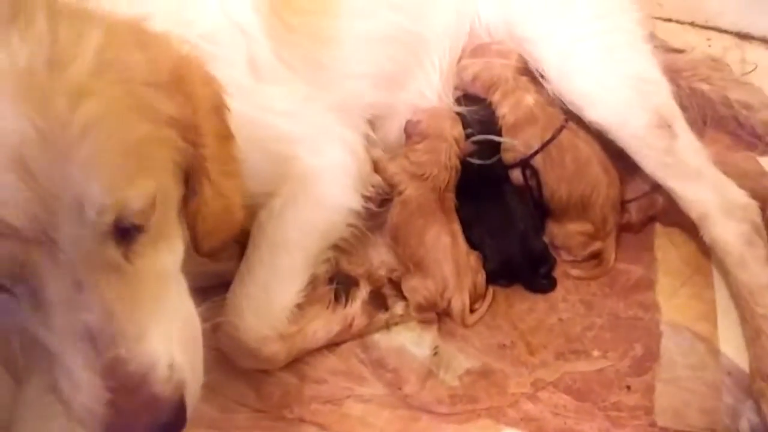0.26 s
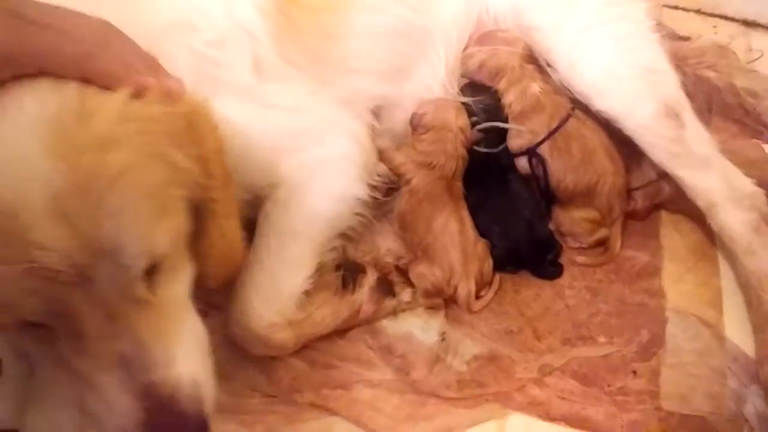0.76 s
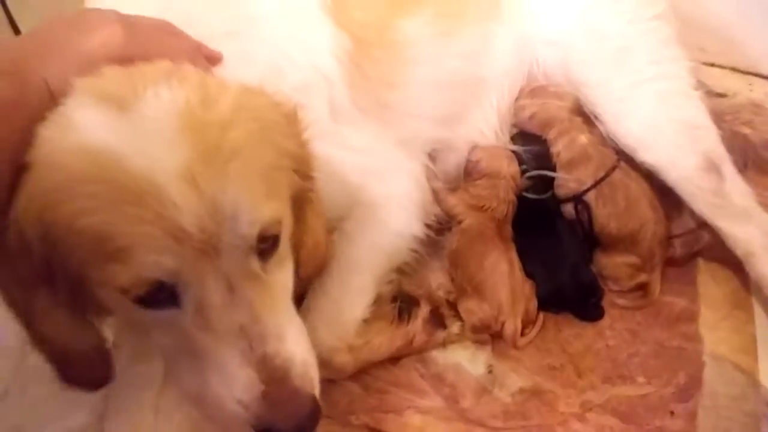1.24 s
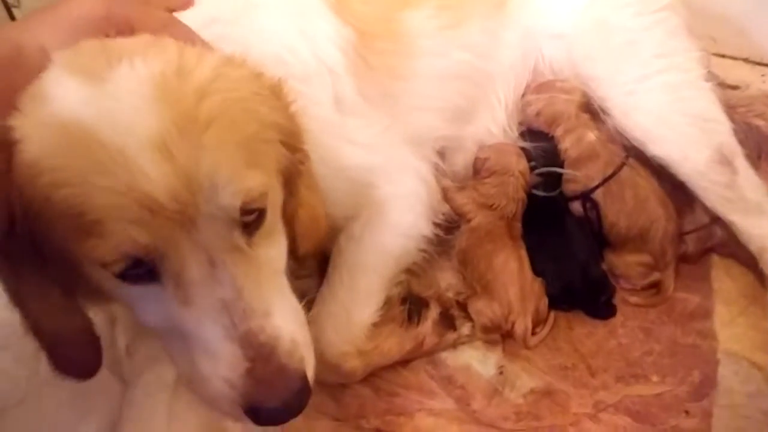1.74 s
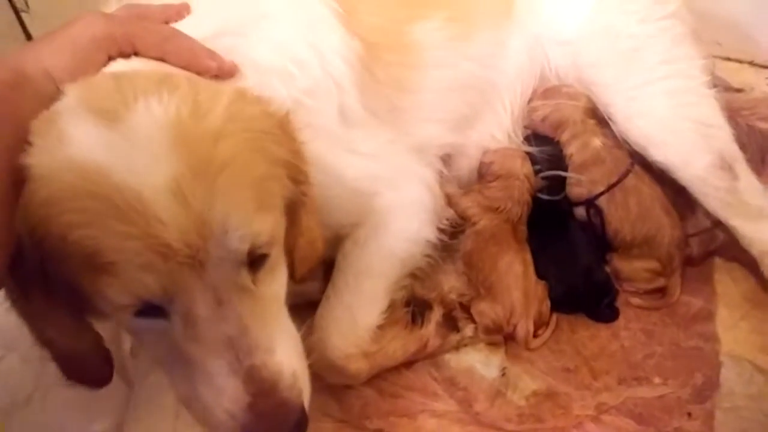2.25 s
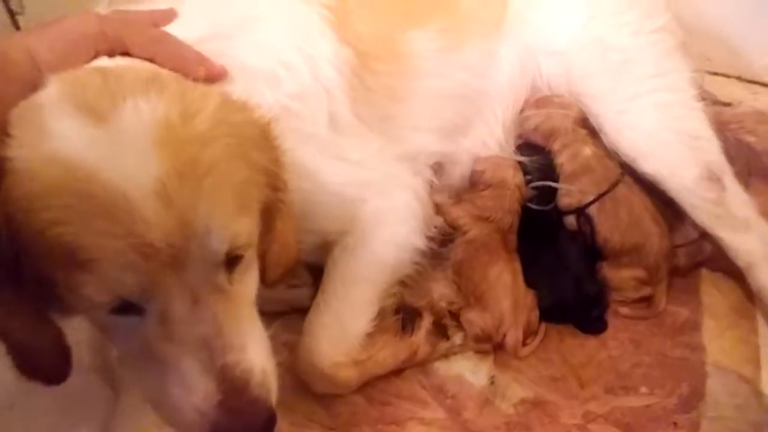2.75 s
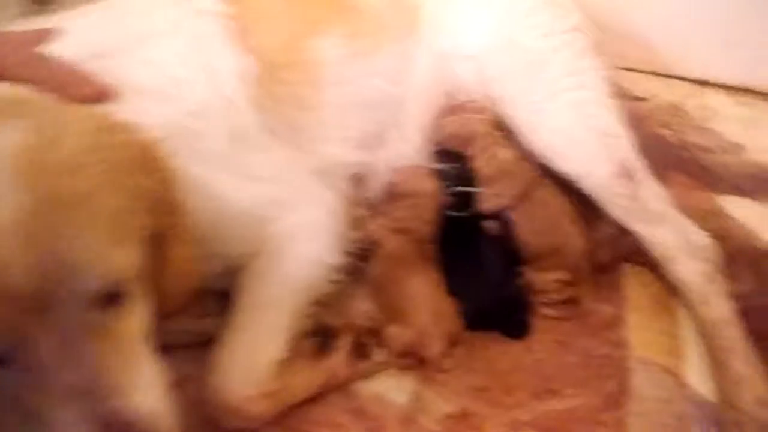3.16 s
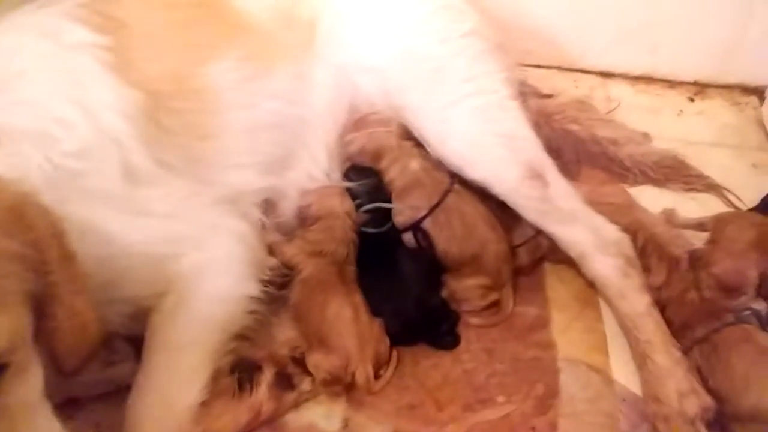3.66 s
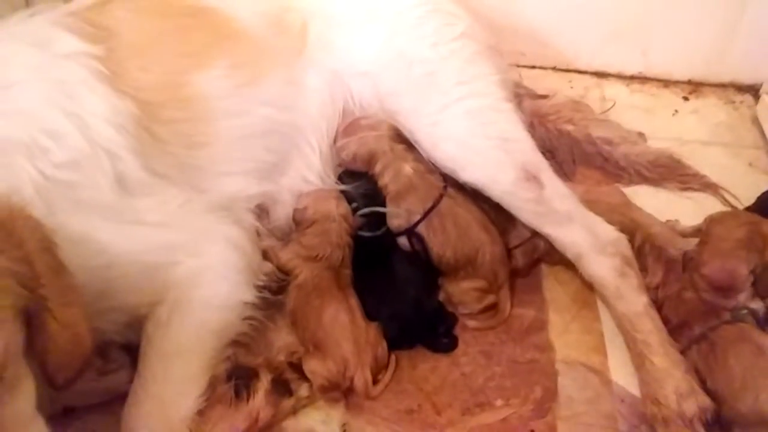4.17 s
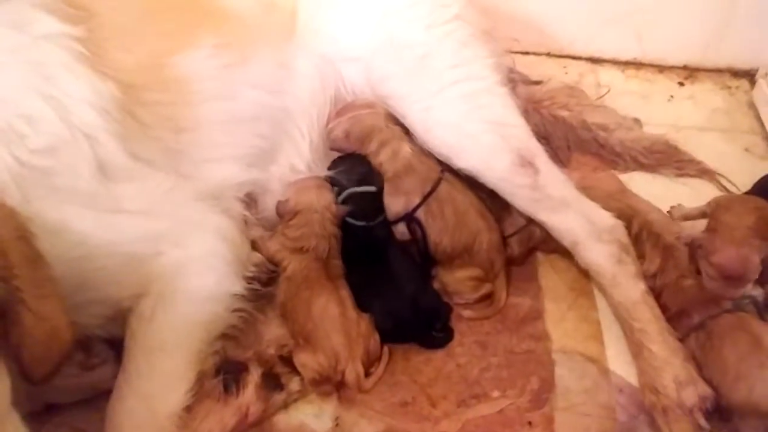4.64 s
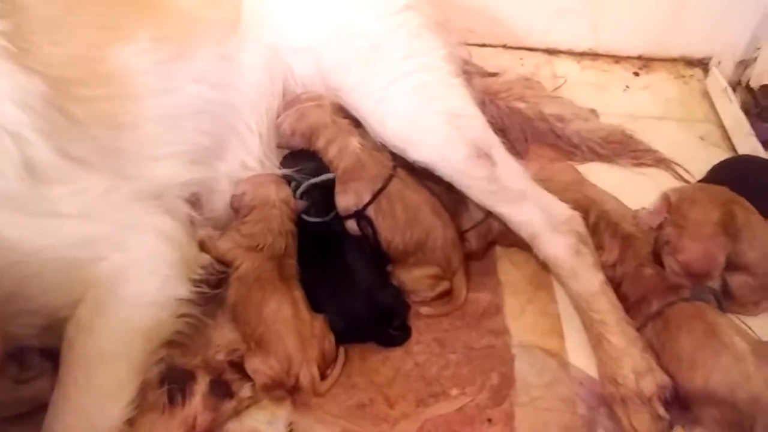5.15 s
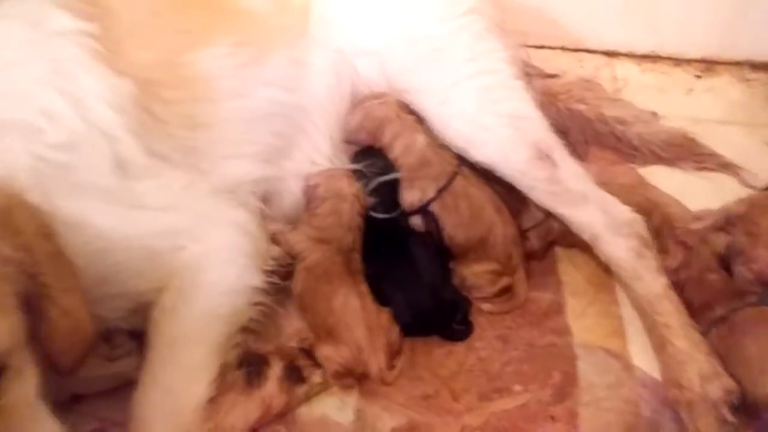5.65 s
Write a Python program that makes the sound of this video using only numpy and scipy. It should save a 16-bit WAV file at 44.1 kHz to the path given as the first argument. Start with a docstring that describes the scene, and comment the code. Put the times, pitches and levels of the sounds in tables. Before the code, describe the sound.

Close, slightly thin pickup of a puppy litter indoors. Strong cries come first, one sliding down and rasping out, another rising to a squeak. Lower grumbling whines and bright short yelps alternate and overlap, a more distant pup joining in. Quiet bumps, breathy hiss and low room air sit underneath; a short grunt comes near the end.

```python
"""Newborn puppies whine in overlapping runs on a blanket in a small quiet room.
Each cry is a gliding stack of overtones, raspier at its ends; hoarse noise follows the low and near pups.
Shaped noise makes breaths, smacks, a grunt and a thin whistle; sparse reflections give the room.
Beneath lie soft low thumps (sine and noise), a mains hum (sine) and room air (filtered noise)."""
import sys
import numpy as np
from scipy import signal
from scipy.fft import rfft, irfft
from scipy.io import wavfile
from scipy.ndimage import uniform_filter1d

SR = 44100
rng = np.random.default_rng(int(sys.argv[2]) if len(sys.argv) > 2 else 0)


def inscribe(sig):
    """Save sig as 16-bit PCM at rate SR to the path in sys.argv[1].

    A 1-D sig is mono; a 2-D sig holds one channel per row.
    Samples are clipped to [-1, 1] before scaling.
    """
    pcm = np.round(np.clip(np.atleast_2d(sig).T, -1, 1) * 32767)
    wavfile.write(sys.argv[1], SR, pcm.astype(np.int16))


N = 260359

# pitch and effort through each cry, one table a cry: [t/s, f/Hz, effort/dB]
LOW_CRIES = [
    [(0.0, 940.4, -17), (0.05, 969, -23), (0.1, 944.5, -21), (0.17, 949, -21.5), (0.25, 871, -26),
     (0.32, 821.6, -27.5), (0.39, 811.7, -29), (0.47, 740, -30), (0.55, 695, -34), (0.6, 612, -36),
     (0.64, 620, -36.5), (0.69, 498.3, -37), (0.75, 604, -42.5), (0.82, 600, -58)],
    [(1.092, 430, -47), (1.15, 490, -36.5), (1.18, 607.3, -37.5), (1.23, 627.5, -32), (1.32, 662, -35),
     (1.38, 767, -29.5), (1.43, 795.6, -29.5), (1.54, 773.4, -33.5), (1.6, 784, -30.5),
     (1.69, 760.5, -35.5), (1.78, 748.5, -33.5), (1.86, 660, -35), (1.95, 645, -36.5), (2.03, 609, -37),
     (2.12, 420, -43), (2.19, 428, -54)],
    [(2.69, 318.4, -37), (2.75, 332.5, -41), (2.82, 402.5, -40), (2.9, 557.7, -41), (2.97, 411, -41),
     (3.01, 433, -39.5), (3.09, 639.4, -37), (3.165, 565.4, -35), (3.24, 643, -35.5), (3.35, 591.7, -37),
     (3.43, 621, -37.5), (3.52, 569, -38.5), (3.655, 448, -42), (3.69, 377.7, -42.5), (3.8, 363, -47),
     (3.87, 341, -46.5), (3.92, 398, -46), (3.96, 398, -78.5)],
    [(4.52, 330, -41.5), (4.62, 371.1, -40.5), (4.72, 443, -38.5), (4.88, 506.2, -39), (5.0, 527.5, -37.5),
     (5.1, 530.6, -37.5), (5.15, 563.3, -36.5), (5.22, 644, -35.5), (5.29, 623.7, -35.5),
     (5.42, 693.7, -33.5), (5.56, 650, -37), (5.62, 542, -38.5), (5.7, 514, -64)],
]
# the same for the near pup: [t/s, f/Hz, effort/dB]
NEAR_CRIES = [
    [(2.49, 767, -44), (2.515, 790, -41), (2.53, 813, -25.5), (2.545, 902, -29), (2.6, 959, -25),
     (2.66, 944, -28), (2.69, 1031, -30.5), (2.73, 825, -35.5), (2.77, 846, -33.5), (2.82, 995, -58)],
    [(2.79, 759, -41), (2.85, 830, -37.5), (2.9, 822, -37.5), (2.98, 729, -39)],
    [(4.008, 703, -39.5), (4.04, 816, -26.5), (4.075, 900, -24), (4.11, 890, -25.5), (4.14, 916, -27),
     (4.18, 894, -24.5), (4.23, 790, -31), (4.28, 645, -36), (4.31, 760, -37.5), (4.35, 700, -34.5),
     (4.37, 790.2, -36.5), (4.387, 993, -33.5), (4.415, 725, -41.5), (4.455, 790, -38.5), (4.49, 697, -42),
     (4.56, 963, -31.5), (4.59, 928, -36.5), (4.68, 975, -32.5), (4.75, 881, -34), (4.82, 1040, -45.5),
     (4.93, 950, -35), (4.97, 967, -35), (5.02, 775, -41), (5.05, 790, -39.5), (5.11, 666, -55.5)],
    [(5.888, 819, -70.5), (5.903, 858, -35.5)],
]


def gain_of(db):
    return 10 ** (np.asarray(db) / 20)


def evened(x):
    """Scale to rms 1."""
    return x / np.sqrt(np.mean(x ** 2) + 1e-20)


def read(points, hz):
    """Interpolate a response over log frequency."""
    f, value = np.transpose(points)
    return np.interp(np.log(hz + 1), np.log(f + 1), value)


def filtered(x, response):
    """Weigh the spectrum by a response in dB."""
    return irfft(rfft(x) * gain_of(read(response, np.fft.rfftfreq(N, 1 / SR))), N)


def add(mix, start_s, sound):
    part = mix[round(start_s * SR):][:len(sound)]
    part += sound[:len(part)]


def wobble(size, hz):
    """Low-passed noise of rms 1, cutoff hz."""
    warmup = 9000
    lowpass = signal.butter(2, hz, fs=SR, output="sos")
    return evened(signal.sosfilt(lowpass, rng.standard_normal(size + warmup))[warmup:])


def band_noise(hz, width_hz):
    """Noise in a band that follows the curve hz: two wobbles on carriers in quadrature."""
    turn = 2 * np.pi * np.cumsum(hz) / SR
    in_phase = wobble(len(hz), width_hz / 2) * np.cos(turn)
    return in_phase + wobble(len(hz), width_hz / 2) * np.sin(turn)


def eased(t, s, v):
    """A smooth cubic curve through the points that never overshoots them."""
    step, slope = np.diff(s), np.diff(v) / np.diff(s)
    a, b = slope[:-1], slope[1:]
    inner = np.where(a * b > 0, 2 * a * b / (a + b + 1e-9), 0)
    m = np.r_[slope[0], inner, slope[-1]]
    i = np.clip(np.searchsorted(s, t) - 1, 0, len(step) - 1)
    u = np.clip((t - s[i]) / step[i], 0, 1)
    glide = v[i] + u * u * (3 - 2 * u) * (v[i + 1] - v[i])
    return glide + step[i] * u * (1 - u) * ((1 - u) * m[i] - u * m[i + 1])


def unrolled(rows):
    """Start, soft-ended fade and the columns of a table at every sample."""
    s, *columns = np.transpose(rows)
    t = np.arange(s[0] - .004, s[-1] + .004, 1 / SR)
    fade = np.clip(np.minimum(t - t[0], t[-1] - t) / .008, 0, 1)
    return max(t[0], 0), fade, [eased(t, s, c) for c in columns]


def background():
    """Room air that wavers slightly, and the hum of an appliance."""
    # air spectrum: [f/Hz, relative density/dB]
    air_spectrum = [(60, -0.5), (110, -5), (170, -9.5), (260, 0.5), (420, -9), (800, -14.5), (2000, -12.5),
                    (4500, -23.5), (9000, -31), (15500, -32.5)]
    air_db, hum_hz, hum_db = -61.5, 120, -64
    air = evened(filtered(rng.standard_normal(N), air_spectrum))
    hum = np.sqrt(2) * np.sin(2 * np.pi * hum_hz * np.arange(N) / SR)
    hum = hum * gain_of(hum_db + 0.4 * wobble(N, 5))
    return gain_of(air_db + 0.11 * wobble(N, 2.3)) * air + hum


def thumps():
    """Each is a dull swell of a few uneven cycles: a low sine with noise around it."""
    # soft low thumps: [t/s, level/dB]
    hits = [(0.244, -45), (0.464, -51.5), (0.595, -54.5), (1.464, -51), (1.756, -53), (2.259, -63),
            (2.702, -52), (2.978, -49), (3.906, -49), (4.134, -55), (5.201, -46.5), (5.367, -48.5),
            (5.43, -46)]
    rise_s, t60_s = 0.0032, 0.49
    out, t = np.zeros(N), np.arange(SR // 4) / SR
    for start_s, db in hits:
        swell = (1 - np.exp(-t / rise_s)) * gain_of(db - 60 * t / t60_s)
        body = np.sin(2 * np.pi * 69 * t) + .6 * band_noise(70 + 0 * t, 95)
        add(out, start_s, swell * body)
    return out


def room(x):
    """Sparse reflections of random sign that die quickly among blankets and walls."""
    t60_s = 0.28
    taps = np.zeros(SR // 2)
    at = np.arange(200, len(taps) - 20, 20)
    at = at + rng.integers(0, 20, len(at))
    taps[at] = rng.choice([-1., 1.], len(at)) * gain_of(-60 * at / SR / t60_s)
    return signal.oaconvolve(x, taps / np.linalg.norm(taps))[:N]


def smacks():
    """Wet smacks of a mouth: short decaying bursts of high noise."""
    # smacks: [t/s, initial level/dB]
    bursts = [(3.8257, -57), (4.144, -61), (4.1984, -67), (4.2199, -52), (4.2304, -51)]
    t60_s = .012
    out, t = np.zeros(N), np.arange(400) / SR
    for start_s, db in bursts:
        add(out, start_s, gain_of(db - 60 * t / t60_s) * band_noise(7000 + 0 * t, 6000))
    return out


def grunt():
    """One short dull puff of low noise."""
    start_s, rise_s, t60_s = 5.772, 0.0046, 0.27
    level_db, centre_hz, width_hz = -45, 620, 550
    t = np.arange(SR // 6) / SR
    swell = np.minimum(t / rise_s, 1) * gain_of(level_db - 60 * t / t60_s)
    return start_s, swell * band_noise(centre_hz + 0 * t, width_hz)


def whistle(rows):
    """A narrow nasal resonance picks out whichever high overtone passes it; faint hiss goes with it."""
    # drive into the resonance: [t/s, level/dB]
    drive = [(4.18, -99.5), (4.3, -75), (4.39, -69.5), (4.501, -78), (4.62, -71), (4.95, -67.5),
             (5.09, -76)]
    peak_hz, half_width_hz = 7750, 350
    start, fade, (hz, *_) = unrolled(rows)
    db = np.interp(start + np.arange(len(hz)) / SR, *np.transpose(drive))
    tone = 0
    for k in range(8, 12):
        tone = tone + band_noise(k * hz, 70) / (1 + ((k * hz - peak_hz) / half_width_hz) ** 2)
    hiss = gain_of(db - 5.5) * band_noise(9000 + 0 * hz, 5000)
    return start, fade * (gain_of(db) * tone + hiss)


def breath(start_s, hold_s, db, hz):
    """Air through a narrowed mouth swells, holds, dies: a narrow hiss, two wider uneven ones above."""
    rise_db_per_s, fall_db_per_s = 147.5, 332.5
    t, centre = np.arange(N) / SR - start_s, np.full(N, hz)
    rise_db = np.minimum(rise_db_per_s * t, 0)
    fall_db = np.maximum(fall_db_per_s * (t - hold_s), 0)
    hiss = band_noise(centre, 450)
    hiss += gain_of(-12.5 + 1.8 * wobble(N, 25)) * band_noise(1.3 * centre, 1900)
    hiss += gain_of(-22.5 + 2.5 * wobble(N, 25)) * band_noise(1.7 * centre, 1300)
    return gain_of(db + rise_db - fall_db) * hiss


def breaths():
    """All the hisses of breath."""
    # breaths: [t/s, hold/s, narrow-hiss level/dB, centre f/Hz]
    puffs = [(0.0, 0.34, -52, 5960), (1.36, 0.0094, -72.5, 6920), (2.68, 0.082, -71.5, 7040)]
    return sum(breath(*row) for row in puffs)


def hoarseness():
    """Rasp gain: slack folds are hoarse, so it follows effort, fades as pitch climbs, and lingers."""
    # each low cry's own share of rasp: [level/dB]
    low_shares = [-0.22, 0.93, 0.1, -0.62]
    # each near cry's own share of rasp: [level/dB]
    near_shares = [-12, -10, -14.5, -16]
    low_slack_hz, near_slack_hz = 553, 740
    clearing_db_per_hz, clear_db, tail_db_per_s = 1.6, -19, 251
    out = np.zeros(N)
    for cries, shares, slack_hz in ((LOW_CRIES, low_shares, low_slack_hz),
                                    (NEAR_CRIES, near_shares, near_slack_hz)):
        for rows, share_db in zip(cries, shares):
            start, fade, (hz, effort_db) = unrolled(rows)
            clearing_db = np.clip(clearing_db_per_hz * (slack_hz - hz), clear_db, 0)
            add(out, start, fade * gain_of(effort_db + share_db + clearing_db))
    fall_db = np.arange(N) * tail_db_per_s / SR
    return gain_of(np.maximum.accumulate(20 * np.log10(out + 1e-9) + fall_db) - fall_db)


def rasp():
    """Hoarse air and a tangle of wavering partials ring in the throat."""
    # throat response: [f/Hz, gain/dB]
    rasp_throat = [(500, -38), (880, -6.5), (1300, -11.5), (1680, 2), (2100, -6.5), (2550, -1), (3050, -12),
                   (3500, -20), (4400, -39.5)]
    tangle = 0
    for hz in np.arange(600, 3600, 230):
        wander_hz = hz * (1 + .07 * wobble(N, 7))
        partial = np.cos(2 * np.pi * np.cumsum(wander_hz) / SR)
        tangle = tangle + gain_of(5 * wobble(N, 14)) * partial
    air = rng.standard_normal(N) * gain_of(2 * wobble(N, 150))
    return evened(filtered(evened(tangle) + .5 * air, rasp_throat)) * hoarseness()


def cry(rows, mouth, throat, husky, voicing_s, blur, count, firm_count):
    """Overtones of the vocal folds weighed by the throat, unsteady at the onset and the close.

    blur: phase stray of overtones above firm_count, rms cycles per order."""
    start, fade, (hz, effort_db) = unrolled(rows)
    size = len(hz)
    hz = uniform_filter1d(hz, size=700, mode="nearest")  # the folds cannot turn sharply
    tilt_db = np.interp(np.linspace(0, len(mouth) - 1, size), range(len(mouth)), mouth)
    t = np.arange(size) / SR
    # a cry already under way at t = 0 has no onset
    rough = husky + 0.41 * np.exp(-t / 0.0062) * (start > 0) + 0.5 * np.exp((t - t[-1]) / 0.039)
    rough += .3 * np.clip(1 - hz / 520, 0, 1)  # slack folds at a low pitch beat unevenly
    jitter = 0.0037 * wobble(size, 40) + 0.16 * rough * wobble(size, 100)
    turns = np.cumsum(hz * (1 + jitter)) / SR
    tone = 0
    for k in range(1, count + 1):
        upper = k > firm_count
        shimmer_db = 1.62 * wobble(size, 39) + 1.81 * wobble(size, 7.75)
        patchy_db = 6 * upper * wobble(size, 8.7) ** 2  # upper overtones drop out in patches
        db = effort_db + read(throat, k * hz) + tilt_db * np.log2(min(k, 3) / 2)
        phase = k * turns + rng.random() + blur * upper * k * wobble(size, 100)
        tone = tone + np.sqrt(2) * gain_of(db + shimmer_db - patchy_db) * np.cos(2 * np.pi * phase)
    # the tone sets in late and stops early
    voiced = np.clip(np.minimum(t + (start == 0), t[-1] - t) / voicing_s, 0, 1) ** 2
    return start, fade * voiced * tone * (1 + rough * wobble(size, 520))


def run_of_cries(cries, mouths, **voice):
    """One pup's cries, each with its own mouth movement."""
    out = np.zeros(N)
    for rows, mouth in zip(cries, mouths):
        add(out, *cry(rows, mouth, **voice))
    return out


def far_pup():
    """Far voice: three overtones through its own throat."""
    # one table a cry: [t/s, f/Hz, effort/dB]
    far_cries = [
        [(0.25, 999, -45.5), (0.35, 1030, -46.5), (0.42, 985, -43.5), (0.5, 880, -36), (0.72, 800, -34),
         (0.78, 869, -37.5), (0.81, 852, -51.5)],
        [(0.84, 1050, -51), (0.95, 1065, -61), (1.0, 1116, -56), (1.1, 1140, -62)],
        [(1.82, 1046, -49.5), (1.93, 985, -41), (2.02, 880, -38.5), (2.2, 875, -37), (2.295, 805, -39),
         (2.335, 928, -42.5), (2.39, 841, -39), (2.47, 1000, -41), (2.57, 904, -55)],
        [(2.71, 547, -71), (2.83, 832, -33.5), (2.88, 791, -43), (2.98, 795, -38.5), (3.06, 939, -42),
         (3.14, 1020, -52.5)],
        [(4.2, 888, -46), (4.3, 910, -42.5), (4.37, 968, -46), (4.45, 855, -41), (4.5, 849, -37.5),
         (4.54, 808, -64)],
        [(4.97, 930, -82), (5.02, 871, -42), (5.15, 889, -38), (5.3, 761, -37.5), (5.4, 752, -44),
         (5.48, 909, -50), (5.51, 900, -64)],
    ]
    # mouth opening at even steps, one row a cry: [overtone tilt/(dB/octave), ..]
    mouths = [(-1.1, 1.5, 2.3), (0.1, 0.034), (0.1, 0.1, 0.0059, 0.3), (0.2, 0.035), (0.1, 3.6),
              (1.1, 2.4, 1)]
    # throat response: [f/Hz, gain/dB]
    throat = [(600, -9.5), (900, 1.5), (1500, -17.5), (2000, -9.5), (2700, -13), (3500, -31.5)]
    return run_of_cries(far_cries, mouths, throat=throat, husky=0.019, voicing_s=0.0091,
                        blur=.008, count=3, firm_count=3)


def high_pup():
    """High voice: three overtones through a thin throat."""
    # one table a cry: [t/s, f/Hz, effort/dB]
    high_cries = [
        [(0.04, 946.5, -25.5), (0.11, 1075, -23.5), (0.16, 1396, -32), (0.25, 1559, -28.5), (0.34, 1710, -48),
         (0.42, 1606, -36.5), (0.48, 1500, -47)],
        [(0.7, 1096, -45), (0.74, 1360, -37), (0.8, 1472, -32.5), (0.85, 1392, -39.5), (0.9, 1440, -74.5)],
        [(1.13, 760, -55.5), (1.18, 898, -33), (1.23, 992.5, -29.5), (1.33, 968, -29.5), (1.41, 1149, -36.5),
         (1.46, 1523, -30), (1.51, 1570, -41.5), (1.55, 1638, -32.5), (1.66, 1644, -35.5), (1.76, 1457, -66.5)],
    ]
    # mouth opening at even steps, one row a cry: [overtone tilt/(dB/octave), ..]
    mouths = [(4.8, -1.1, -6), (0.1, 2), (-2, 0.3, -1, 1)]
    # throat response: [f/Hz, gain/dB]
    throat = [(700, -5.5), (1000, 0), (1500, 0), (2000, 0), (2300, -4), (2900, -21.5), (3500, -41.5),
              (4300, -68.5)]
    return run_of_cries(high_cries, mouths, throat=throat, husky=0.027, voicing_s=.02,
                        blur=.008, count=3, firm_count=2)


def near_pup():
    """Near voice: four overtones through a shrill throat; the third cry whistles."""
    # mouth opening at even steps, one row a cry: [overtone tilt/(dB/octave), ..]
    mouths = [(0.1, 1, 0.1), (4.4, 7.9), (4.5, -1.5, 4, 5, 0.5, 8, 1, 1.5, 0.1, 6), (11, 5.6)]
    # throat response: [f/Hz, gain/dB]
    throat = [(700, -4.5), (900, 1), (1500, 1), (1800, 4), (2000, -10), (2300, -11), (2900, -27),
              (3700, -30.5), (4300, -53.5)]
    out = run_of_cries(NEAR_CRIES, mouths, throat=throat, husky=0.01, voicing_s=0.0088,
                       blur=.022, count=4, firm_count=2)
    add(out, *whistle(NEAR_CRIES[2]))
    return out


def low_pup():
    """Low voice: ten overtones through a low throat."""
    # mouth opening at even steps, one row a cry: [overtone tilt/(dB/octave), ..]
    mouths = [(1.2, 4.4, 0.77, 6.4, 0.7, 0.1, -0.4), (0.85, 3.3, 1.1, 4.5, 1.7, 1.5),
              (0.53, -1.4, 0.59, 1, -1.6, -3.4, -2.58), (-1.1, -0.95, -0.65, -2.8, 0.82, -0.74)]
    # throat response: [f/Hz, gain/dB]
    throat = [(320, -24.5), (400, -8), (500, -10), (650, -3.5), (800, -3), (1200, -1.5), (1700, -0.5),
              (2100, -8), (2600, -1), (3100, -11), (3350, -19.5), (3600, -25.5), (3900, -31), (4600, -77.5)]
    return run_of_cries(LOW_CRIES, mouths, throat=throat, husky=0.015, voicing_s=0.086,
                        blur=.004, count=10, firm_count=3)


def puppies():
    """All cries with their rasp, and the breaths, smacks and grunt."""
    out = smacks() + breaths() + rasp()
    add(out, *grunt())
    return out + far_pup() + high_pup() + near_pup() + low_pup()


def scene():
    """Pups with reflections at -13 dB, over thumps and background."""
    pups = puppies()
    return (background() + thumps() + gain_of(-13) * room(pups) + pups)[None]


def record(dry):
    """The microphone drops the deepest bass; then the band limit."""
    low_cut_hz, edge_hz = 58, 15750
    thin = signal.sosfilt(signal.butter(3, low_cut_hz, "highpass", fs=SR, output="sos"), dry)
    band_limit = signal.firwin(511, edge_hz, window=("kaiser", 9), fs=SR)
    return signal.oaconvolve(thin, band_limit[None], "same")


dry = scene()
out = record(dry)
inscribe(out)
```